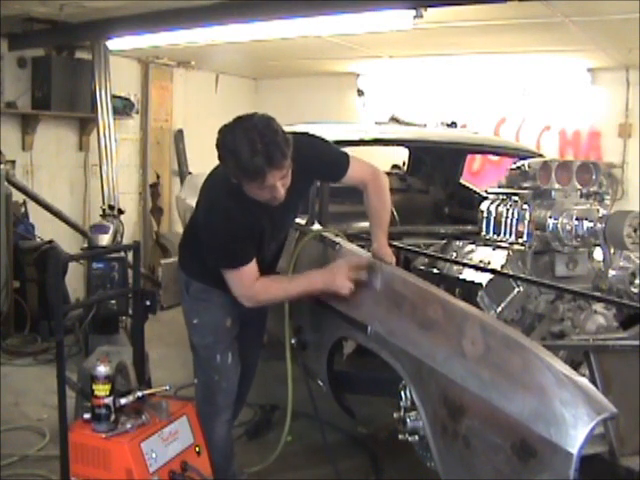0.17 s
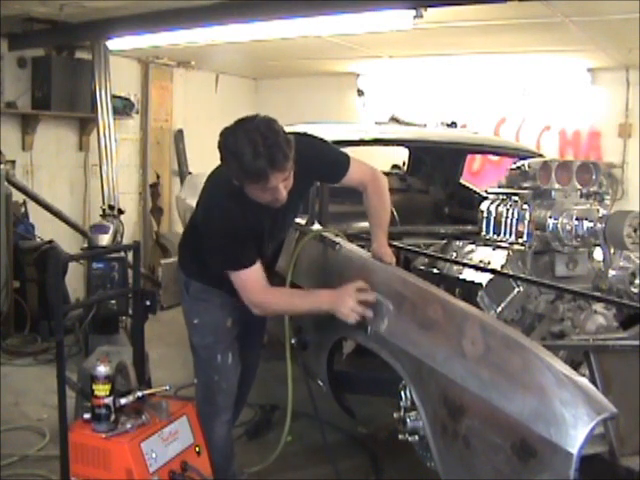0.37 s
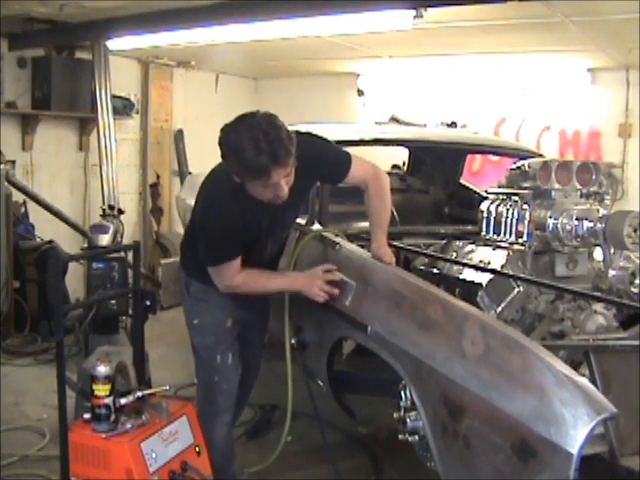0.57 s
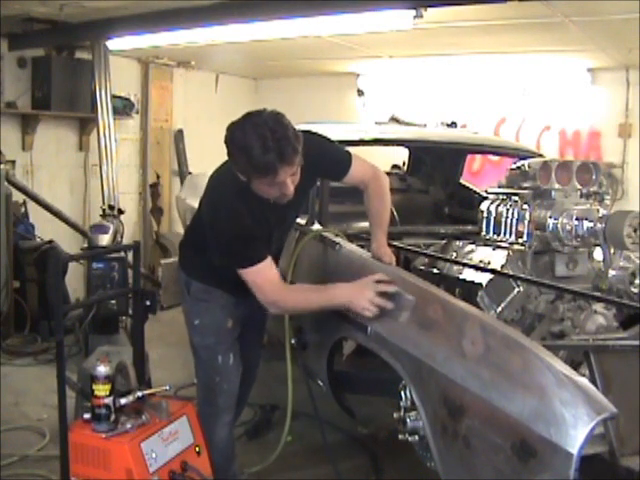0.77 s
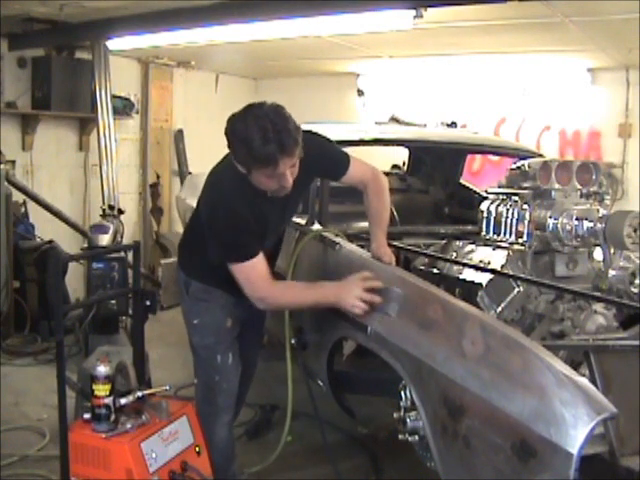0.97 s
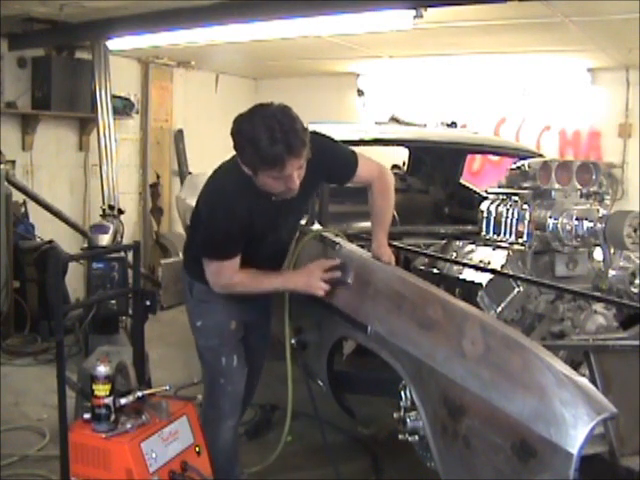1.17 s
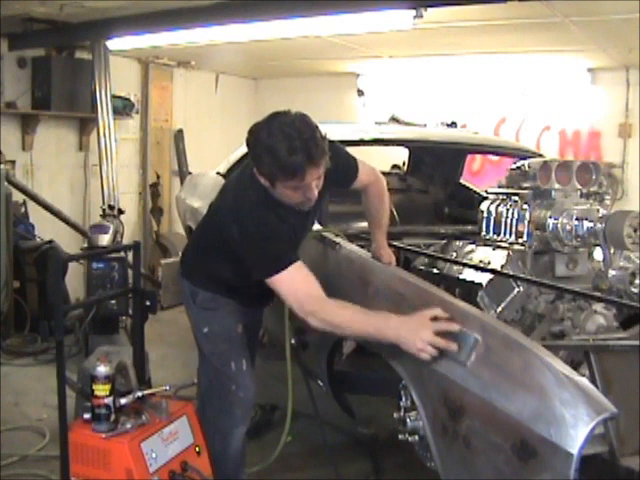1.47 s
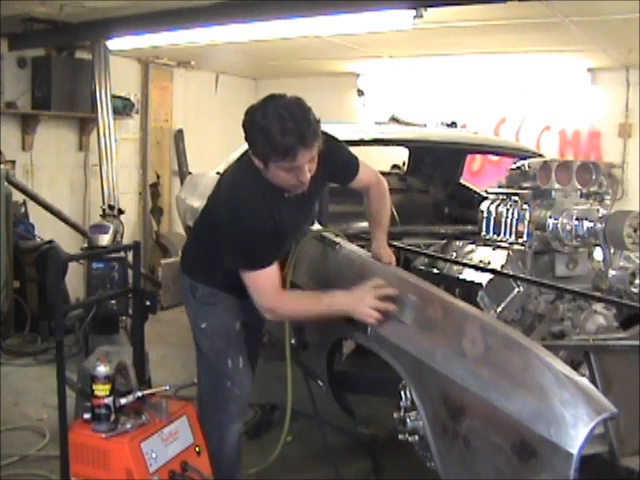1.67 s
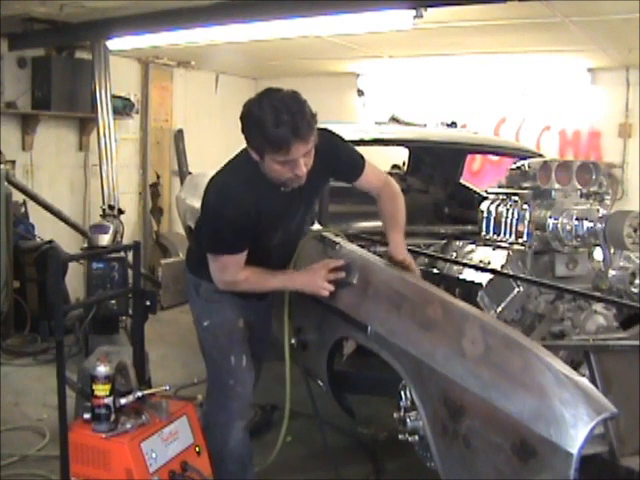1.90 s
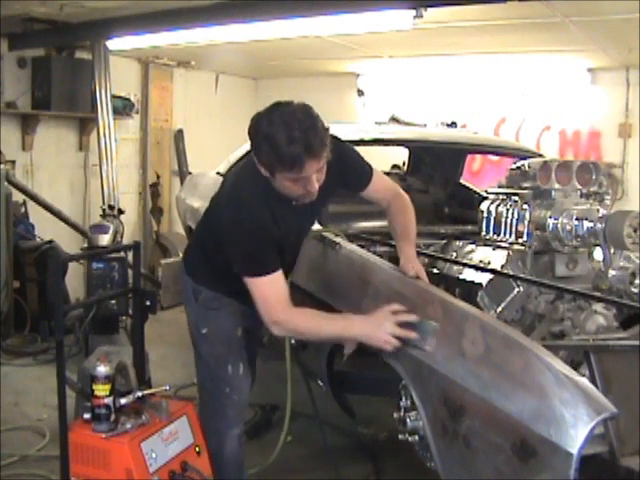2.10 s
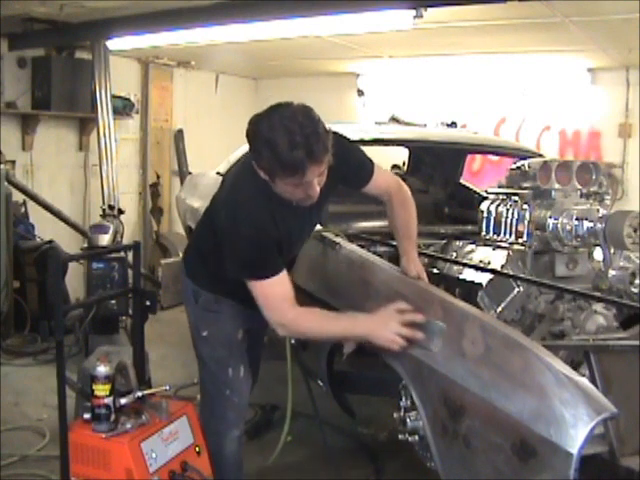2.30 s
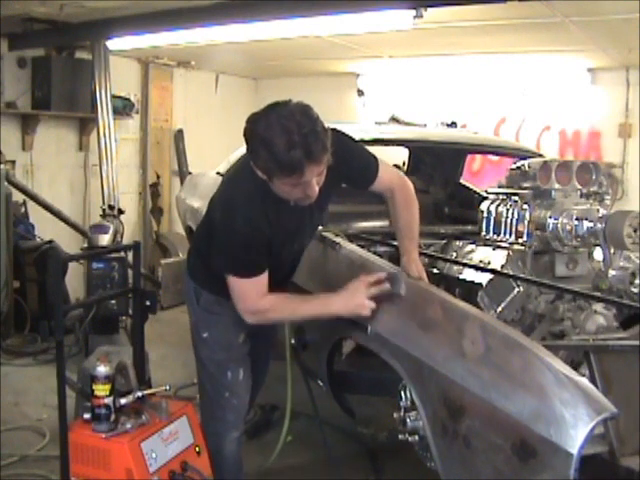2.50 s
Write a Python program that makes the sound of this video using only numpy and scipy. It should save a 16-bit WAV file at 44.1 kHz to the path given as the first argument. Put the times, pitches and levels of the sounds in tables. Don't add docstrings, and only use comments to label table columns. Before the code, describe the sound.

A sanding block scrapes loudly to and fro over a bare steel fender, quick short strokes first, then longer ones, dulling briefly at each turn, in a hard-walled garage with low hum, picked up by a camcorder.

```python
import sys
import numpy as np
from scipy import signal
from scipy.fft import rfft, irfft, next_fast_len
from scipy.io import wavfile

SR = 44100
rng = np.random.default_rng(int(sys.argv[2]) if len(sys.argv) > 2 else 0)


def store_wav(level_fs):
    pcm = np.round(np.clip(np.atleast_2d(level_fs), -1, 1) * 32767)
    wavfile.write(sys.argv[1], SR, pcm.T.astype(np.int16))


def gain_from_db(level_db):
    decades = np.asarray(level_db, float) / 20
    return 10 ** decades


N = 116865


def rms_one(x):
    return x / np.sqrt(np.mean(x ** 2) + 1e-20)


def at_hz(points, hz):
    points_hz, values = np.transpose(points)
    return np.interp(np.log(hz), np.log(points_hz), values)


def drift(rate_hz):
    pole = np.exp(-80 * np.pi * rate_hz / SR)
    white = rng.standard_normal(N // 40 + 2002)
    slow = signal.lfilter([1], [1, -2 * pole, pole * pole], white)[2000:]
    return np.interp(np.arange(N) / 40, np.arange(len(slow)), rms_one(slow))


def resonate(x, hz, width_hz):
    pole = np.exp(-np.pi * width_hz / SR)
    feedback = [1, -2 * pole * np.cos(2 * np.pi * hz / SR), pole * pole]
    return signal.lfilter(np.array([1, 0, -1]) * (1 - pole * pole) / 2, feedback, x)


def third_octaves(low_hz, count):
    edges = low_hz * 2 ** (np.arange(count + 1) / 3)
    return [(np.sqrt(low * high), signal.butter(2, [low, high], "band", fs=SR, output="sos"))
            for low, high in zip(edges, edges[1:])]


def hand():
    # start_s, slowest_speed_db, slowing_time_s, next_stroke_pressure_db, dull_rub_db
    turns_round = [(-.08, -6, 0.029, 4.5, 7.5), (0.066, -12.5, 0.021, 4.5, 1.5),
                   (0.225, -9.5, .022, 3.4, 3), (.387, -9, .022, 3, 1), (0.55, -9, .022, 3, 3),
                   (0.73, -9, 0.019, 2.5, 1), (1.014, -10.5, 0.023, 2, 0.4), (1.281, -8, 0.025, 3.5, 0.5),
                   (1.65, -14, 0.033, 0.9, -0.5), (2.001, -9.5, 0.017, 1, .5),
                   (2.363, -13.5, 0.028, 1.5, -0.5), (2.603, -7, 0.017, -1.5, 0.5)]
    slowing_share = 0.97
    ease_share, ease_longer = 0.3, 3.0
    t = np.arange(N) / SR
    turn_s, slowest_db, span_s, turn_press_db, turn_rub_db = np.transpose(turns_round)
    gap_s = t - turn_s[:, None]
    far = gap_s / (span_s[:, None] * np.where(gap_s < 0, slowing_share, 1))
    sharp = np.exp(-far ** 2)
    easing = np.exp(-(far / ease_longer) ** 2)
    speed_db = slowest_db @ ((1 - ease_share) * sharp + ease_share * easing)
    stroke_middle_s = (turn_s + np.append(turn_s[1:], turn_s[-1] + 0.15)) / 2
    press_db = np.interp(t, stroke_middle_s, turn_press_db)
    rub_db = np.interp(t, turn_s, turn_rub_db)
    return speed_db, press_db, rub_db


def grit_ticks(speed_db):
    grains_per_s, grain_spread_db = 30000, 1
    chance = np.clip(grains_per_s * gain_from_db(speed_db / 2) / SR, 0.01, 1)
    spread = np.minimum(rng.exponential(1, (2, N)), 4)
    sizes = gain_from_db(grain_spread_db * spread) * rng.standard_normal((2, N))
    return sizes * (rng.random((2, N)) < chance) / np.sqrt(chance)


def rasp(patchy_db, chatter_db):
    # pitch_hz, density_db (per Hz)
    rasp_colour = [(100, 1), (200, -17.5), (600, -16.5), (1940, -5.5), (4000, -1.5), (7470, 1.5),
                   (11500, -3), (16000, -14.5)]
    # pitch_hz, share (dB per dB)
    follows_speed = [(200, -0.24), (700, -0.42), (1500, 0.025), (3000, 0.17), (5000, 0.42), (8000, 0.78),
                     (11000, 1.33), (15000, 1.6)]
    # pitch_hz, share (dB per dB)
    follows_rub = [(200, 2.8), (1000, 1.57), (2500, 0.83), (6000, .01)]
    # pitch_hz, delay_s
    sag_later = [(1000, 0.0041), (4000, 0.022), (8000, .006), (14000, -0.0048)]
    # start_s, ring_db, body_db
    panel_place = [(0, 0.5, -5), (.14, 2.4, -1.5), (.3, -0.7, 1), (.45, 0.9, -1.3), (.6, 0, -0.5),
                   (.76, -2.5, 1.5), (.93, 1.8, 1.5), (1.08, -0.3, 2), (1.22, 0.7, -1.5), (1.45, 0.4, 1.6),
                   (1.66, -0.5, .3), (1.9, 0, -.3), (2.05, 1, 1.1), (2.2, -1.2, 0), (2.4, -2.8, -1.5),
                   (2.55, 1, -1), (2.65, 1.5, 1)]
    # pitch_hz, width_hz, level_db
    sheet_rings = [(820, 48, -10), (1095, 17, -12), (1240, 60, -9), (1564, 24, -21), (1935, 91, -12.5),
                   (2415, 74, -16), (4010, 40, -20), (4830, 89, -20), (5770, 120, -50.5), (6980, 67, -26)]
    ring_hz, ring_octaves = 5100, 0.7
    body_hz, body_octaves = 1770, 1.6
    t = np.arange(N) / SR
    speed_db, press_db, rub_db = hand()
    place_s, ring_db, body_db = np.transpose(panel_place)
    ticks = grit_ticks(speed_db)
    chatter = chatter_db * drift(5.7)
    neighbour_patch = drift(5.2)
    grit = 0
    for k, (hz, sos) in enumerate(third_octaves(138.9, 21)):
        motion_db = np.interp(t - at_hz(sag_later, hz), t, speed_db) + chatter + press_db
        ring_part = np.exp(-(np.log2(hz / ring_hz) / ring_octaves) ** 2)
        body_part = np.exp(-(np.log2(hz / body_hz) / body_octaves) ** 2)
        band_db = at_hz(rasp_colour, hz) + np.interp(t, place_s, ring_db * ring_part + body_db * body_part)
        band_db = band_db + at_hz(follows_speed, hz) * motion_db + at_hz(follows_rub, hz) * rub_db
        own_patch = drift(12.7)
        band_db = band_db + patchy_db * (own_patch + neighbour_patch) * 0.5
        grit = grit + gain_from_db(band_db) * signal.sosfilt(sos, ticks[k % 2])
        neighbour_patch = own_patch
    ringing = 0
    for k, (hz, width_hz, db) in enumerate(sheet_rings):
        ringing = ringing + gain_from_db(db) * (-1) ** k * resonate(grit, hz, width_hz)
    return gain_from_db(-10) * rms_one(grit + ringing)


def flexes():
    # peak_s, level_db, pitch_hz, half_length_s
    pushes = [(.075, -26.5, 71.3, 0.093), (0.294, -30, 73.5, 0.049), (.42, -33.5, 76, 0.061),
              (0.573, -27.5, 70.4, 0.035), (0.777, -37, 72, 0.052), (0.978, -33.5, 72, 0.086),
              (1.3, -38, 66, .03), (1.653, -32, 68, 0.045), (2.41, -46, 66, 0.036),
              (0.048, -27, 118, 0.023), (.28, -31.5, 126, 0.085), (.58, -29, 125, .035),
              (1.043, -35, 111, 0.068), (1.29, -33, 124, 0.035), (2.0, -37, 124, 0.061),
              (2.34, -31, 124, 0.047), (2.58, -28.5, 120, 0.029), (0.09, -30.5, 315, 0.039),
              (.23, -57, 260, 0.027), (0.585, -30, 182.8, .03), (2.6, -35, 820, 0.055),
              (.37, -40, 238, 0.082), (.72, -34, 245, 0.065), (.84, -40, 100, 0.057)]
    t = np.arange(N) / SR
    stereo_phase = np.array([[0.08], [-0.08]])
    thuds = 0
    for (peak_s, db, hz, span_s), phase in zip(pushes, rng.uniform(0, 2 * np.pi, 30)):
        age = (t - peak_s) / (span_s * np.where(t < peak_s, 0.85, 1.2))
        thuds = thuds + gain_from_db(db) * np.exp(-age ** 2) * np.sin(2 * np.pi * hz * t + phase + stereo_phase)
    return thuds


def room(x):
    # pitch_hz, side_minus_mid_db
    room_width = [(100, -22), (250, -22), (640, -15), (1300, -19), (2300, -17.5), (4500, -12), (8000, -10),
                  (13000, -17)]
    t60_s, treble_t60_s, split_hz = 0.3, 0.15, 3850
    room_db, side_db = -12, -0.5
    paths_per_s = 2.504
    wider_below_hz, slow_wider_db = 5000, -0.24
    t = np.arange(SR // 2) / SR
    white = rng.standard_normal((3, 2, len(t))) * (t > 0.006)
    low = signal.sosfilt(signal.butter(2, split_hz, fs=SR, output="sos"), white)
    tails = low * gain_from_db(-60 * t / t60_s) + (white - low) * gain_from_db(-60 * t / treble_t60_s)
    tails = rfft(tails / np.sqrt(np.sum(tails ** 2, axis=-1, keepdims=True)), N)
    phase = paths_per_s * np.arange(N) / SR + np.arange(3)[:, None] / 3
    path_gains = np.sqrt(2 / 3) * np.cos(np.pi * phase)
    hz = np.maximum(np.fft.rfftfreq(N, 1 / SR), 1)
    wet = np.sum(rfft(x * path_gains)[:, None] * tails, axis=0)
    mid, side = irfft(wet * gain_from_db([room_db + 0 * hz, side_db + at_hz(room_width, hz)]), N)
    dull_side = signal.sosfiltfilt(signal.butter(2, wider_below_hz, fs=SR, output="sos"), side)
    speed_db = hand()[0]
    side = side + (gain_from_db(slow_wider_db * speed_db) - 1) * dull_side
    return mid + side * [[1], [-1]]


def shop():
    # pitch_hz, density_db (per Hz)
    rumble_colour = [(20, -22), (30, -17), (50, 3), (75, -1.5), (100, 0), (150, 2), (200, -9.5),
                     (400, -5.5), (700, -17)]
    # pitch_hz, width_hz, level_db
    motor_drone = [(110, 7.9, -56.5), (238, 5.6, -45.5), (295, 17, -58), (328, 35, -48), (124, 8.7, -51)]
    run_in = 8000
    white = rng.standard_normal((2, 2, N + run_in))
    rumble = 0
    for k, (hz, sos) in enumerate(third_octaves(24.8, 15)):
        rumble = rumble + gain_from_db(at_hz(rumble_colour, hz)) * signal.sosfilt(sos, white[k % 2])
    bed = gain_from_db(-40.5) * rms_one(rumble)
    for k, (hz, width_hz, db) in enumerate(motor_drone):
        bed = bed + gain_from_db(db) * rms_one(resonate(white[k % 2], hz, width_hz))
    mid, side = bed[:, run_in:]
    hum_db = -38 + 6 * drift(4.2)
    hum_hz = 124 + 2.59 * drift(2.68)
    hum = gain_from_db(hum_db) * np.sin(2 * np.pi * np.cumsum(hum_hz) / SR)
    return mid + hum + gain_from_db(-26) * side * [[1], [-1]]


def gain_control(dry):
    attack_s, release_s = 0.0021, 0.011
    threshold_db, squeeze, makeup_db = -24, 0.52, 6
    attack, release = np.exp(-1 / (attack_s * SR)), np.exp(-1 / (release_s * SR))
    power = np.mean(dry ** 2, axis=0)
    average = power.mean()
    feedback = np.convolve([1, -attack], [1, -release])
    power = signal.lfilter([(1 - attack) * (1 - release)], feedback, power - average) + average
    over_db = np.maximum(10 * np.log10(np.maximum(power, 1e-9)) - threshold_db, 0)
    return dry * gain_from_db(makeup_db - squeeze * over_db)


def microphones(x):
    # pitch_hz, left_minus_right_db
    stereo_lean = [(60, 1), (180, -1), (550, 2), (1650, -0.5), (4970, 0.0), (15000, -1.5)]
    n = next_fast_len(N + 4096)
    hz = np.maximum(np.fft.rfftfreq(n, 1 / SR), 1)
    x = irfft(rfft(x, n) * gain_from_db(at_hz(stereo_lean, hz) * [[0.5], [-0.5]]), n)[:, :N]
    return signal.sosfilt(signal.ellip(12, 0.5, 75, 15750, fs=SR, output="sos"), x)


def scene():
    grit = rasp(patchy_db=1.03, chatter_db=-0.1)
    return grit + room(grit) + flexes() * gain_from_db([[0.4], [-0.4]]) + shop()


def low_pass(x):
    return signal.sosfilt(signal.butter(12, 16810, fs=SR, output="sos"), x)


def record(dry):
    ceiling = 1.08
    x = ceiling * np.tanh(gain_control(dry) / ceiling)
    return low_pass(microphones(x))


dry = scene()
out = record(dry)
store_wav(out)
```